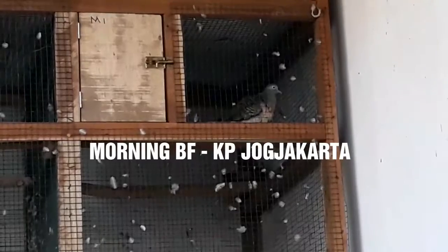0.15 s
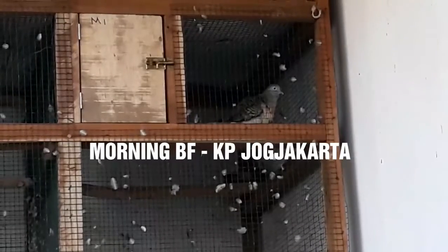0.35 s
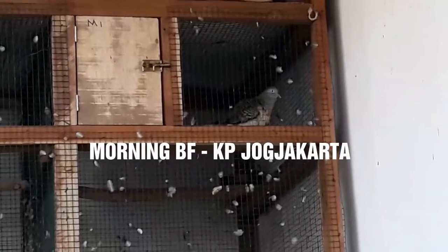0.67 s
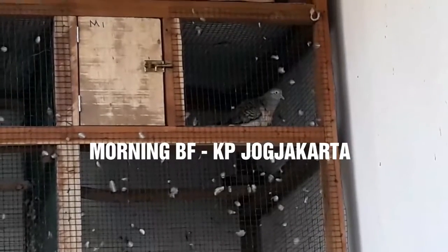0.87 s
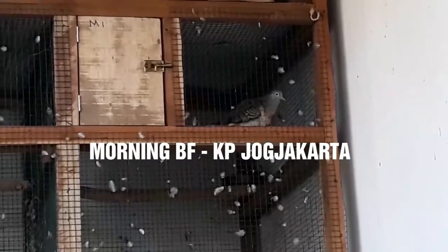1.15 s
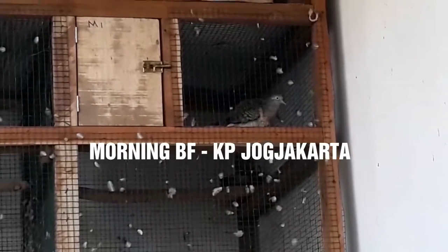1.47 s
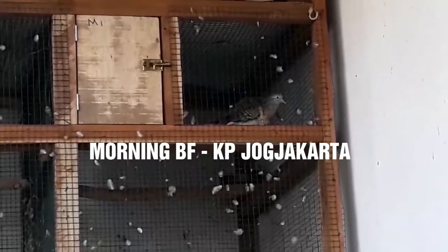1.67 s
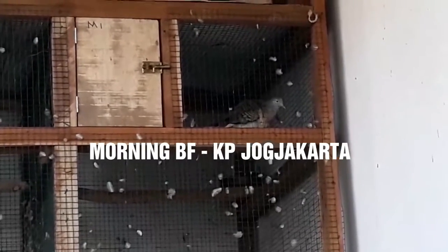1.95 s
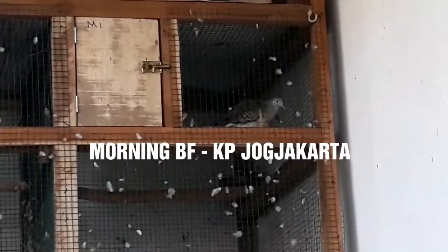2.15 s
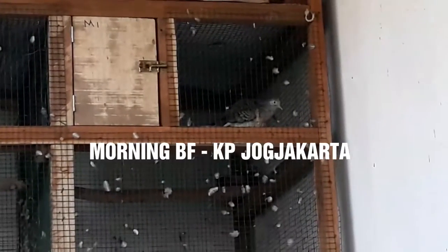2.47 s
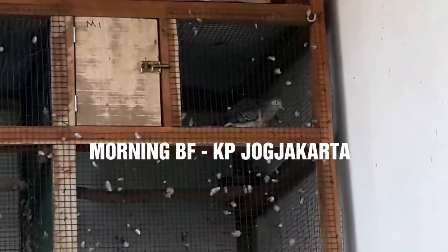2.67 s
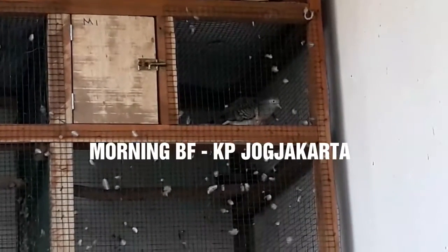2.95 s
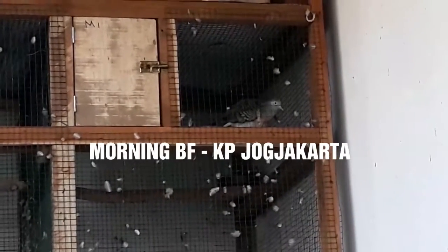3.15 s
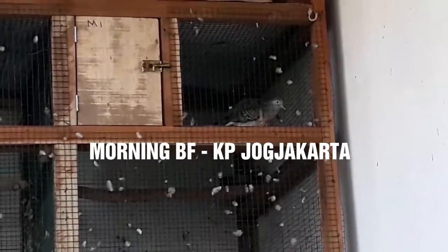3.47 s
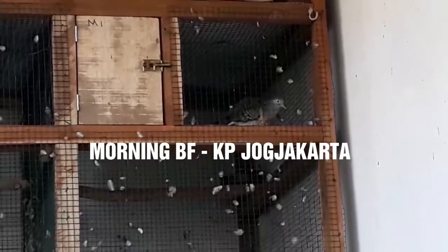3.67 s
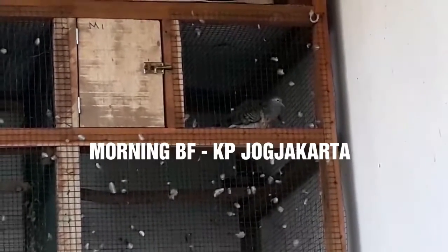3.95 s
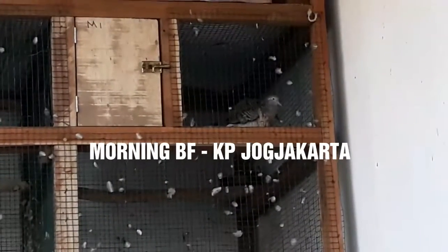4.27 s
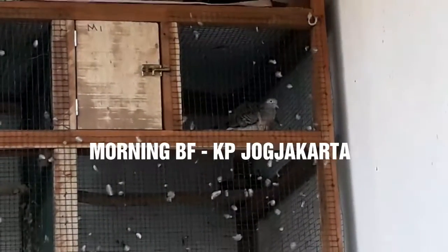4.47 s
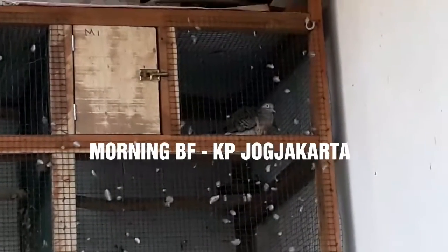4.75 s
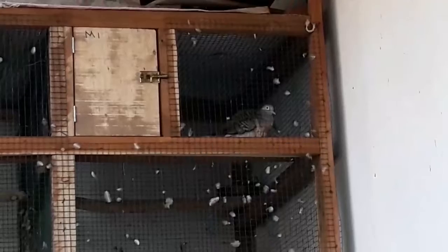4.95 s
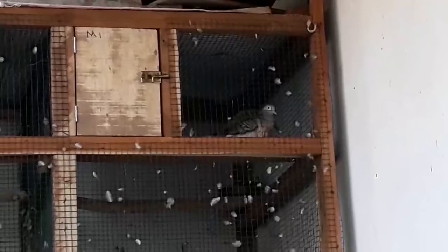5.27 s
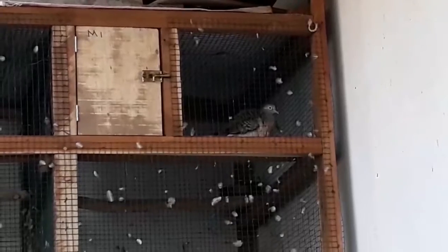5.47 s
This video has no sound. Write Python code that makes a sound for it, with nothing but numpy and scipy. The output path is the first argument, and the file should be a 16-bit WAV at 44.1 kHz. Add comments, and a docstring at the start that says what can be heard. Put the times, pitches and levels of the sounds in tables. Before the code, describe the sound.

Fairly close outdoor pickup of caged doves: overlapping calls first, with feet thumping softly on wood, then a clear near dove repeating nine short, evenly spaced coos after a brief opening, and a long final one. A higher bird breaks upward around it and a faint echoing one coos behind. Tiny cheeps, wire ticks, dry rustle, soft hiss and low town hum; a high coo ends it.

```python
"""Doves in a row of wire and plywood cages, the town humming behind throughout. From the start a near dove ends
a coo, a higher one calls, most of its notes breaking upward, a far one coos with a strong octave; feet thump on
perches. From about 1.3 s the near dove gives a coo, nine short arched notes, then at 3.6 s a long closing coo.
A small bird cheeps at 3.2, 4.2 and 5.0 s, feet thump from 4.1 s on, a faint glide falls at 5.3 s, the high dove ends.
Voices are gliding tones through cage resonances and echo; thumps are perch modes and noise; the rest mostly noise."""
import sys
import numpy as np
from scipy import signal
from scipy.fft import rfft, irfft, next_fast_len
from scipy.io import wavfile
from scipy.ndimage import uniform_filter1d, map_coordinates

SR = 44100
rng = np.random.default_rng(int(sys.argv[2]) if len(sys.argv) > 2 else 0)


def dump(signal):
    """Clip the signal to [-1, 1] and save it as 16-bit WAV at the path in sys.argv[1]."""
    limited = np.clip(np.atleast_2d(signal).T, -1, 1)
    pcm = np.round(limited * 32767).astype(np.int16)
    wavfile.write(sys.argv[1], SR, pcm)


N = 247797  # length in samples

# Levels in the voice tables are as sung, before throat, cage and yard.
# Near dove, short notes: start t/s, end t/s, pitch the glides aim at f/Hz, level/dB
NEAR_SHORT_NOTES = [(1.543, 1.586, 828, -19), (1.7708, 1.8354, 828.4, -14), (1.9807, 2.0446, 831.2, -13),
                    (2.1771, 2.2457, 824, -12.5), (2.39, 2.464, 828.2, -13), (2.604, 2.682, 821.7, -15),
                    (2.837, 2.919, 819, -14), (3.0789, 3.161, 815.3, -14), (3.3303, 3.452, 809.2, -16)]
# Near dove, long coos, one curve each: t/s, pitch f/Hz, level/dB
NEAR_LONG_COOS = [
    [(0, 800, -24.5), (.012, 776, -21), (.024, 762.6, -38), (.05, 763, -25), (.16, 753.4, -23.5),
     (.24, 747.4, -24.5), (.265, 744, -24.5), (.3, 738, -26), (.34, 730, -36.5), (.48, 726, -32)],
    [(1.325, 661, -54), (1.336, 730, -27), (1.356, 805, -18), (1.395, 825, -12), (1.43, 856, -31),
     (1.452, 887, -14.5), (1.468, 882, -26.5), (1.49, 926, -8.5), (1.512, 925, -29)],
    [(3.648, 652, -57), (3.658, 720, -25.5), (3.674, 777, -16.5), (3.69, 793, -18), (3.76, 795, -16),
     (3.85, 783.5, -16), (3.91, 798, -26.5), (3.96, 779.3, -14.5), (4.0, 779, -21.5), (4.12, 757, -26),
     (4.145, 750, -46.5), (4.255, 759, -52.5)],
]
# High dove: start t/s, turn from low to upper pitch t/s, end t/s, upper pitch before rounding and sag f/Hz,
# level before the turn/dB, level just after it/dB, level at the end before the fade/dB
HIGH_NOTES = [(0, .038, .225, 1047, -17, -22.5, -19), (0.346, 0.366, 0.37, 806, -15.5, -31.5, -39),
              (.445, .464, .492, 954, -19.5, -22.5, -43), (0.553, .569, .606, 955, -18.5, -22.5, -30),
              (0.663, 0.689, 0.812, 977, -20, -22.5, -29), (1.451, 1.464, 1.612, 1038, -27, -13, -22.5),
              (2.132, 2.161, 2.373, 1029, -18, -22, -25.5), (2.355, 2.39, 2.6, 821.3, -25.5, -33, -37),
              (2.573, 2.588, 2.605, 942, -21.5, -25, -37.5), (2.676, 2.695, 2.718, 971, -20.5, -22, -24.5),
              (2.81, 2.832, 2.99, 981.6, -26, -22.5, -34), (5.426, 5.469, 5.72, 1035, -17.5, -21, -25.5)]
# Far dove: start t/s, end t/s, pitch the glides aim at f/Hz, level before swell and fade/dB, octave level/dB
FAR_COOS = [(.015, 0.26, 843.6, -30.5, -10.5), (.74, 0.889, 852, -34, -11),
            (1.138, 1.304, 849.5, -32, -11.5), (1.575, 1.774, 848.8, -30.5, -10.5),
            (1.99, 2.175, 835, -29, -12.5), (2.47, 2.693, 829, -32.5, -10), (2.939, 3.114, 829, -31, -13),
            (3.4, 3.649, 828, -32, -12), (4.291, 4.704, 823.5, -35.5, -8.5)]

# Overtones of each voice: multiple of the pitch, level/dB (those above the first waver)
NEAR_SHORT_TONE = [(1, 0), (2, -38), (3, -46), (4, -58), (8, -62)]
NEAR_LONG_TONE = [(1, -1.5), (2, -38), (3, -46), (4, -54), (8, -55)]
HIGH_TONE = [(1, 0), (2, -37), (3, -47), (6, -48)]
# Puff as a near note opens: f/Hz, relative density level/dB per Hz
PUFF_SPECTRUM = [(400, -41), (620, 6), (850, 3), (1150, -3.5), (1500, -38.5), (3000, -40), (6000, -79.5)]

# Air resonances of the cage around each bird: f/Hz, width f/Hz, level/dB, phase/rad
NEAR_CAGE = [(778.7, 11.8, 8.4, -2.79), (797, 21.7, 5.9, -2.02), (850.3, 8, 12, -3.61)]
HIGH_CAGE = [(812.8, 8.3, 8, 0.12), (899, 61, -3, 0.18)]
# Reflection from a wall close to the near dove: delay t/s, gain (linear)
NEAR_WALL = (.0129, -.615)
# Yard echo decay: f/Hz, t60 t/s
YARD_DECAY = [(300, 0.34), (900, 0.47), (3000, 0.43), (10000, 0.02)]

# Feet landing: t/s, relative level/dB, scrape level/dB against the thump
THUMPS = [(0.133, -18, -20), (0.672, -25, -15.5), (4.121, -28, -38), (4.823, -30.5, -24),
          (5.049, -27.5, -21), (5.24, -31.5, -17.5), (5.442, -30, -28)]
# Modes of the wooden perch: f/Hz, mean level/dB, t60 t/s
PERCH_MODES = [(293.8, -4.5, 0.14), (411.3, -4, 0.09), (666, -10, 0.099), (730, -33.5, 0.067),
               (1870, -23, 0.036)]
# Thud and claw scrape: f/Hz, relative density level/dB per Hz
THUD_SPECTRUM = [(120, -20.5), (250, 1.5), (480, -2.0), (800, -20.5), (1500, -54.0), (3000, -93)]
SCRAPE_SPECTRUM = [(400, -18.0), (900, -2.5), (2600, -11.5), (4000, -22.5), (7000, -76.5)]

# Wire and seed: t/s, relative level/dB, top treble level/dB, t60 t/s
TICKS = [(0.1998, -32, -15, 0.29), (0.646, -40.5, -14, 0.62), (1.0293, -46.5, -11, 0.44),
         (1.2668, -38.5, -20, 0.24), (1.4609, -35.5, -18, 0.51), (1.771, -40, -26, 0.29),
         (1.8295, -40.5, -12.5, 0.47), (1.904, -33.5, -19, 0.18), (1.981, -37, -15, 0.13),
         (2.0622, -32, -12, 0.12), (2.1261, -37, -8, 0.31), (2.15, -32.5, -22, 0.2),
         (2.2869, -32.5, -16, 0.1), (3.3843, -40.5, -35, 0.25), (3.9813, -44, -35, 0.21),
         (4.2026, -37, -14.5, 0.25), (4.2482, -37.5, 0.5, 0.27), (4.3227, -33, -12, 0.099),
         (4.465, -42, -25, 0.27), (4.5069, -34, -14, 0.21), (4.7054, -30, -13, 0.14),
         (5.015, -39, -15, 0.49)]
# Two hollow taps, then three bursts heard as one faint downward glide from 5.3 s:
# t/s, nominal f/Hz, level before the decay/dB, t60 t/s
TAPS_AND_GLIDE = [(1.053, 1140, -38, 0.078), (3.552, 2090, -40, 0.14), (5.302, 1215, -45.5, 0.27),
                  (5.339, 950, -43.5, 0.16), (5.384, 996, -39, 0.74)]
# Small bird: t/s, nominal first f/Hz, nominal last f/Hz (sounded at 0.94 of these), level before shaping/dB
CHEEPS = [(3.233, 7400, 6347, -49.5), (4.151, 7020, 6450, -51), (5.009, 7480, 6960, -43.5)]

# Movement behind the doves: t/s, relative rustle level/dB, relative stir level/dB
RUSTLE = [(0.0, -57.5, -42.5), (0.3, -65.5, -50), (0.62, -61.5, -53), (0.768, -52, -42), (0.9, -77.5, -62),
          (1.1, -61, -54), (1.3, -66.5, -44.5), (1.45, -53, -50), (1.799, -64.5, -47.5), (2.0, -54.5, -41),
          (2.22, -63.5, -50.5), (2.55, -53.5, -46), (2.7, -69, -54), (3.02, -61, -52.5), (3.3, -66, -54),
          (3.549, -62.5, -51.5), (4.049, -65.5, -50.5), (4.259, -59.5, -53), (4.6, -62, -53),
          (5.2, -60.5, -56.5), (5.45, -66.5, -54), (5.62, -63.5, -48.5)]
# Colours of rustle, stir, steady hiss and town hum: f/Hz, relative density level/dB per Hz
DRY_SEED = [(2060, -35.5), (3500, -5.5), (3730, -11), (5150, 7), (6580, -2.5), (8440, 4.5), (9390, -1.5),
            (10700, -24), (11600, -7), (14400, -12), (15600, -30.5)]
STIR = [(260, -7.5), (450, -7), (584, -9.5), (721, 3), (779, -4.5), (1560, -9.5), (1730, -9.5),
        (2500, -15.5), (4500, -30.5), (5850, -62.5), (9900, -120)]
AIR = [(260, -37), (450, -8), (579, -13.5), (605, -16), (662, -15.5), (864, -8.5), (903, -19), (1350, -18),
       (1560, -13.5), (1730, 9.5), (3480, -19), (8860, -19), (15600, -33)]
TOWN = [(15, -42.5), (25, -30), (48, -1), (75, -14), (141, 0.5), (184, -5), (200, -8), (223, -9),
        (279, -11.5), (354, -14.5), (384, -17.5), (501, -21), (560, -21.5), (600, -24.5), (700, -46.5),
        (910, -57), (1540, -120)]
AIR_DB, TOWN_DB = -64.5, -46  # rms of hiss and hum at the microphone, before its bass cut

TOP_HZ = 15725  # upper band limit of the sound
HIGH_LOW_HZ, HIGH_CLIMB_HZ = 798, 25  # low pitch reached at the turn, climb towards it
HIGH_ROUND_HZ, HIGH_SAG_HZ_PER_S, HIGH_DROOP_HZ = 44, 520, 30  # shortfall after the turn, fall, extra fall at the end
HIGH_ATTACK_SHARE, HIGH_RELEASE_S = 0.35, 0.008  # swell as a share of the time before the turn, fade
FAR_RISE, FAR_RISE_S = 0.1068, 0.0217  # upward swoop as a share of the pitch, its time constant
FAR_SAG, FAR_SAG_POWER = 0.063, 2.69  # fall by the end as a share, how late it comes
FAR_ATTACK_S, FAR_SWELL_DB, FAR_SWELL_S = 0.0072, 3, 0.046  # attack, then slower growth
FAR_FADE_DB, FAR_THIRD_DB = 8.5, -31.5  # fade by the end, level of the third harmonic
FAINT_TICKS, FAINT_TICK_DB = 45, -47  # extra ticks at random moments: how many, middle of their relative level


def amp(db):
    """Level in dB to linear gain."""
    return 10 ** (np.asarray(db) / 20)


def unit(x):
    """Scales a signal to an rms of 1."""
    return x / np.sqrt(np.mean(x ** 2) + 1e-20)


def along(points, hz):
    """Reads (f/Hz, value) points on a log frequency axis."""
    f, v = np.transpose(points)
    return np.interp(np.log(hz + 1), np.log(f + 1), v)


def filtered(x, response):
    """Multiplies the spectrum of x by a complex response of frequency, with room for the tail."""
    m = next_fast_len(len(x) + SR // 2)
    hz = np.fft.rfftfreq(m, 1 / SR)
    return irfft(rfft(x, m) * response(hz), m)[:len(x)]


def add(track, s, sound):
    """Mixes a sound into the track at s seconds."""
    part = track[round(s * SR):][:len(sound)]
    part += sound[:len(part)]


def noise(spectrum, patchy_db, count=N):
    """Coloured noise of rms 1 whose gain varies in patches of time and frequency."""
    z = signal.stft(rng.standard_normal(count + 512), nperseg=512)[2]
    field = uniform_filter1d(rng.standard_normal(z.shape), 6, 0)
    field = uniform_filter1d(field, 8, 1)
    x = signal.istft(z * amp(patchy_db * unit(field)), nperseg=512)[1][:count]
    return unit(filtered(x, lambda hz: amp(along(spectrum, hz))))


def voice(pitch_hz, level_db, tone):
    """A nearly pure tone with 2 ms soft edges; its overtones waver in strength."""
    phase = 2 * np.pi * np.cumsum(pitch_hz) / SR
    n = np.arange(len(phase))
    edges = np.clip(np.minimum(n, n[::-1]) / (.002 * SR), 0, 1)
    tones = np.zeros(len(n))
    for multiple, db in tone:
        waver = map_coordinates(rng.standard_normal(len(n) // 1200 + 4), [n / 1200])
        waver_db = 3 * waver if multiple > 1 else 0
        tones += amp(db + waver_db) * np.sin(multiple * phase)
    return np.sqrt(2) * amp(level_db) * edges * tones  # root 2: level as rms


def coos(notes, tone):
    """Sings a list of pitch and level curves, their corners smoothed."""
    track = np.zeros(N)
    for rows in notes:
        s, hz, db = np.transpose(rows)
        t = np.arange(s[0], s[-1], 1 / SR)
        smooth = lambda v: uniform_filter1d(np.interp(t, s, v), 200, mode="nearest")
        add(track, s[0], voice(smooth(hz), smooth(db), tone))
    return track


def yard(x, db):
    """Echo of the yard: a noise tail, each frequency dying at its own speed."""
    hz, t, z = signal.stft(rng.standard_normal(SR // 2), SR, nperseg=256)
    decay = amp(-60 * t / along(YARD_DECAY, hz)[:, None])
    tail = signal.istft(z * decay, SR, nperseg=256)[1]
    late = np.pad(x, (600, 0))  # the echo sets in some 14 ms after the sound
    return amp(db) * signal.fftconvolve(late, tail / np.linalg.norm(tail))[:N]


def caged(x, modes, yard_db, wall=(0, 0)):
    """The cage rings on when a glide sweeps its resonances and beats with the note; wall and yard answer."""
    delay_s, wall_gain = wall

    def response(f):
        total = 1 + wall_gain * np.exp(-2j * np.pi * f * delay_s)
        for centre, width, db, turn in modes:
            resonance = 1j * f * width / (centre * centre - f * f + 1j * f * width)
            total = total + amp(db) * np.exp(1j * turn) * resonance
        return total

    return filtered(x, response) + yard(x, yard_db)


def near_dove():
    """Short notes swoop up and sag as the air runs out, long coos follow curves; all but the first coo open with a puff."""
    track, puffs = coos(NEAR_LONG_COOS, NEAR_LONG_TONE), np.zeros(N)
    for start, end, top_hz, db in NEAR_SHORT_NOTES:
        t = np.arange(0, end - start, 1 / SR)
        left = t[::-1]  # time to the end of the note
        pitch_hz = top_hz * (1 - .153 * np.exp(-t / .0119) - .1275 * np.exp(-left / .004))
        swell_db = -22 * np.exp(-t / .0088) - 25 * np.exp(-left / .0023)
        add(track, start, voice(pitch_hz, db + swell_db, NEAR_SHORT_TONE))

    t = np.arange(SR // 8) / SR
    envelope = amp(-29.5 - 60 * t / 0.22) * (1 - np.exp(-t / 0.0044))
    openings = [row[0] for row in NEAR_SHORT_NOTES] + [rows[0][0] for rows in NEAR_LONG_COOS[1:]]
    for start in openings:
        add(puffs, start - .006, envelope * noise(PUFF_SPECTRUM, 0, count=len(t)))

    # the swollen throat radiates little below its tuning
    track = filtered(track, lambda hz: 1 / (1 + (670 / (hz + 1)) ** 14))
    return caged(track, NEAR_CAGE, -21, NEAR_WALL) + puffs


def high_dove():
    """Most notes break upward from a low pitch within 6 ms and then sag; two stay low."""
    track = np.zeros(N)
    for start, snap, end, top_hz, low_db, high_db, end_db in HIGH_NOTES:
        t = np.arange(start, end, 1 / SR)
        up = np.clip((t - snap) / .006 + .5, 0, 1)  # 0 before the turn, 1 after it
        lead = (t - start) / (snap - start)  # 1 at the turn
        low_hz = HIGH_LOW_HZ + HIGH_CLIMB_HZ * (np.minimum(lead, 1) - 1)
        rounding_hz = HIGH_ROUND_HZ * np.exp(np.minimum(snap - t, 0) / 0.0076)
        droop_hz = HIGH_DROOP_HZ * np.exp((t - end) / 0.029)
        upper_hz = top_hz - HIGH_SAG_HZ_PER_S * (t - snap) - rounding_hz - droop_hz
        upper_db = np.interp(t, [snap, end], [high_db, end_db])
        level_db = low_db + up * (upper_db - low_db)
        level_db -= 22 * np.exp(-lead / HIGH_ATTACK_SHARE)
        level_db -= 22 * np.exp((t - end) / HIGH_RELEASE_S)
        add(track, start, voice(low_hz + up * (upper_hz - low_hz), level_db, HIGH_TONE))
    return caged(track, HIGH_CAGE, yard_db=-17)


def far_dove():
    """Slow arched coos, strong octave, wet echo; their level varies at random by a decibel or two, as over many paths."""
    track = np.zeros(N)
    for start, end, top_hz, db, octave_db in FAR_COOS:
        t = np.arange(0, end - start, 1 / SR)
        closing = (t / t[-1]) ** FAR_SAG_POWER
        pitch_hz = top_hz * (1 - FAR_RISE * np.exp(-t / FAR_RISE_S) - FAR_SAG * closing)
        paths_db = 1.5 * map_coordinates(rng.standard_normal(40), [t * 35])  # 35 random values a second
        opening_db = -FAR_SWELL_DB * np.exp(-t / FAR_SWELL_S) - 25 * np.exp(-t / FAR_ATTACK_S)
        ending_db = -FAR_FADE_DB * closing - 15 * np.exp(-t[::-1] / 0.0048)
        tone = [(1, 0.013), (2, octave_db), (3, FAR_THIRD_DB)]
        add(track, start, voice(pitch_hz, db + paths_db + opening_db + ending_db, tone))
    return track + yard(track, db=-11)


def thumps():
    """Soft feet ring the wooden perch, push a dull thud and scrape with the claws."""
    track, t = np.zeros(N), np.arange(SR // 4) / SR
    onset = 1 - np.exp(-t / 0.012)
    for s, db, scrape_db in THUMPS:
        ring = np.zeros(len(t))
        for hz, level, t60 in PERCH_MODES:
            struck_db = level + rng.normal(0, 0.91)  # each landing excites the modes a little differently
            ring += amp(struck_db - 60 * t / t60) * np.sin(2 * np.pi * hz * t)
        thud = amp(-10 - 60 * t / 0.17) * noise(THUD_SPECTRUM, 0, count=len(t))
        scrape = amp(scrape_db - 60 * t / 0.27) * noise(SCRAPE_SPECTRUM, 0, count=len(t))
        add(track, s - .006, amp(db + 4) * (ring + thud + scrape) * onset)
    return track + yard(track, db=-13.5)


def ticks():
    """Wire and seed: sharp bursts of hiss, some brighter than others, each at most a quarter second long."""
    track, t = np.zeros(N), np.arange(SR // 4) / SR
    rise = 1 - np.exp(-t / .003)
    faint = [(when * N / SR, FAINT_TICK_DB + 8 * (size - .5), -20, .1)
             for when, size in rng.random((FAINT_TICKS, 2))]
    for s, db, top_db, t60 in TICKS + faint:
        colour = [(1500, -20), (3500, -12.5), (5500, -4), (8500, -4.5), (9800, -10.5),
                  (11000, top_db), (14500, top_db + 4), (15700, top_db - 14.5)]
        add(track, s, amp(db - 11.0 - 60 * t / t60) * rise * noise(colour, 1.3, count=len(t)))
    return track


def small_sounds():
    """Hollow taps, and from 5.3 s a faint downward glide, as decaying band noise; falling, warbling cheeps as tones."""
    track, t = np.zeros(N), np.arange(SR // 5) / SR
    rise = 1 - np.exp(-t / 0.0022)
    for s, hz, db, t60 in TAPS_AND_GLIDE:
        band = [(hz * .8, -30), (hz * 0.53, 0), (hz * 1.05, 0), (hz * 1.22, -12), (hz * 2.1, -40), (hz * 3, -90)]
        add(track, s, amp(db - 60 * t / t60) * rise * noise(band, 0, count=len(t)))
    for s, from_hz, to_hz, db in CHEEPS:
        u = np.linspace(0, 1, round(0.022 * SR))  # progress through a 22 ms cheep
        warble_hz = 450 * np.sin(2 * np.pi * 2.9 * u)  # a fast trill blurs the cheep
        glide_hz = from_hz + (to_hz - from_hz) * u
        add(track, s, np.sin(np.pi * u) * voice(glide_hz + warble_hz, db, [(0.94, 0.0036)]))
    return track + yard(track, db=-10.5)


def background():
    """Rustle and stir of many birds, as noise of changing level, over steady hiss and the low hum of the town."""
    s, rustle_db, stir_db = np.transpose(RUSTLE)
    t = np.arange(N) / SR
    rustle = amp(np.interp(t, s, rustle_db) - 1.0) * noise(DRY_SEED, patchy_db=1.2)
    stir = amp(np.interp(t, s, stir_db) - 0.5) * noise(STIR, patchy_db=2.5)
    hiss = amp(AIR_DB) * noise(AIR, patchy_db=2.5)
    town = amp(TOWN_DB) * noise(TOWN, patchy_db=0.5)
    return rustle + stir + hiss + town


def scene():
    """The three doves, then the small sounds and the background."""
    doves = near_dove() + high_dove() + far_dove()
    return (doves + thumps() + ticks() + small_sounds() + background())[None]


def record(dry):
    """The microphone drops the deepest bass; nothing is kept above the band limit."""
    return filtered(dry[0], lambda hz: (hz < TOP_HZ) / (1 + (38 / (hz + 1)) ** 6))[None]


dry = scene()
out = record(dry)
dump(out)
```